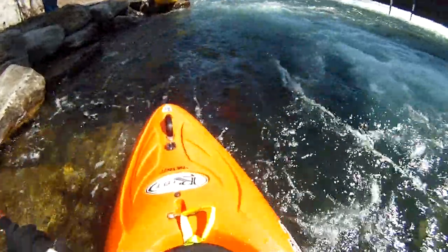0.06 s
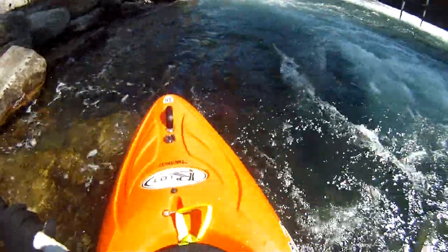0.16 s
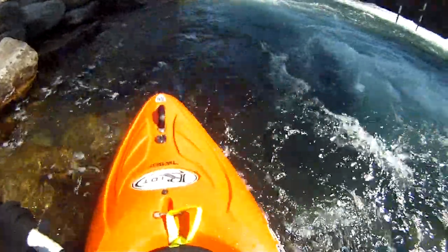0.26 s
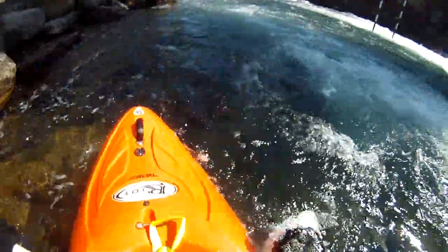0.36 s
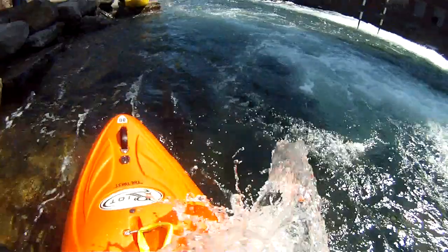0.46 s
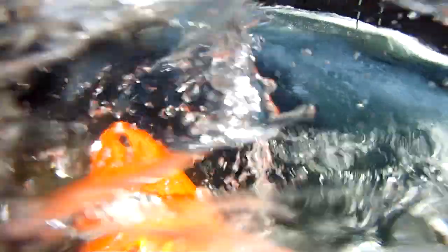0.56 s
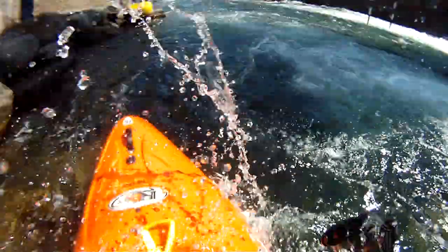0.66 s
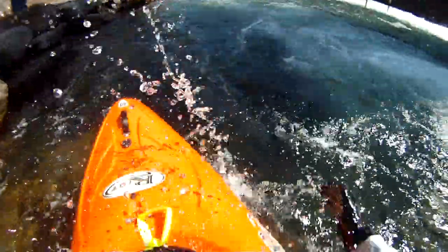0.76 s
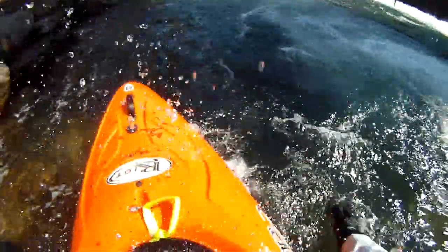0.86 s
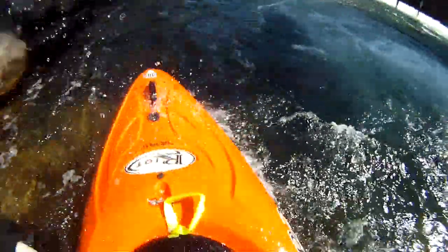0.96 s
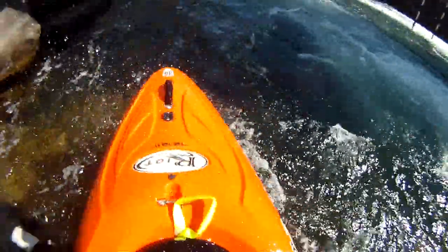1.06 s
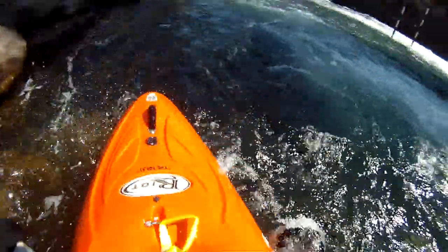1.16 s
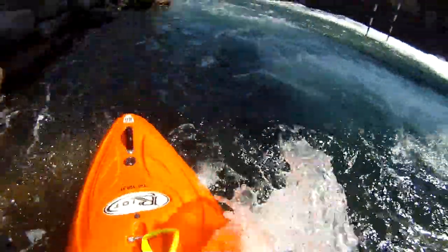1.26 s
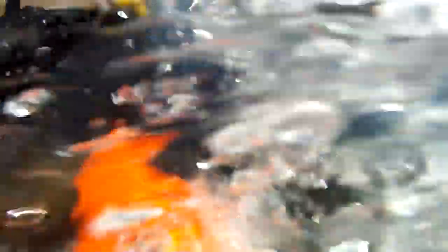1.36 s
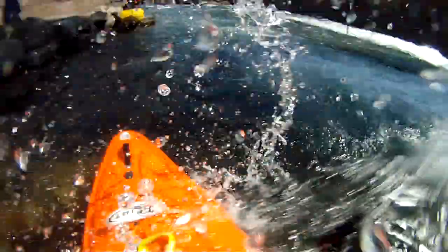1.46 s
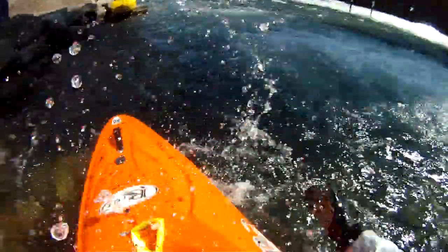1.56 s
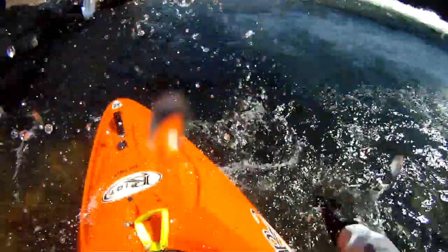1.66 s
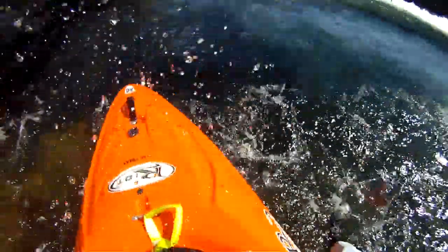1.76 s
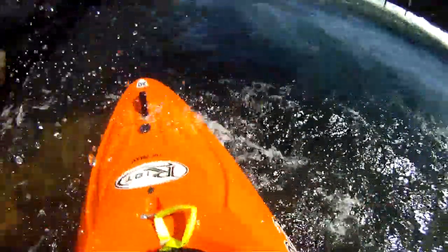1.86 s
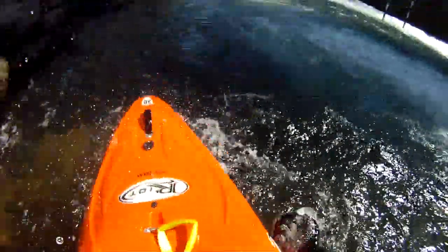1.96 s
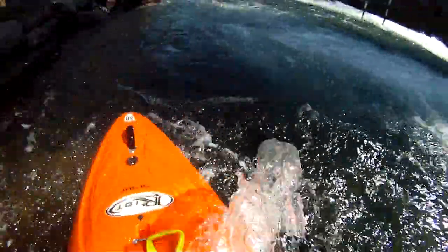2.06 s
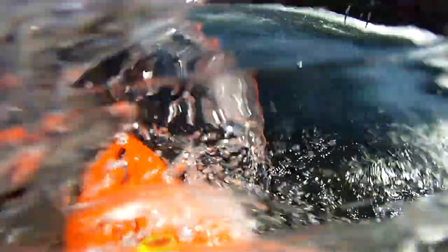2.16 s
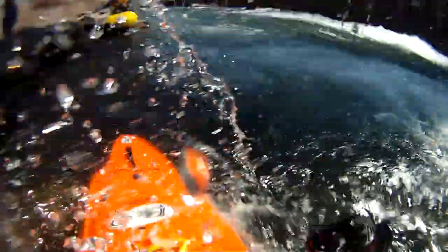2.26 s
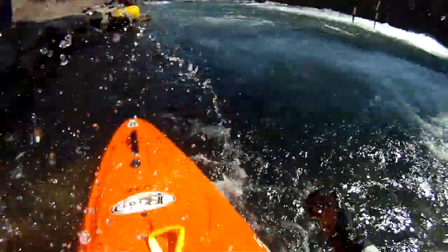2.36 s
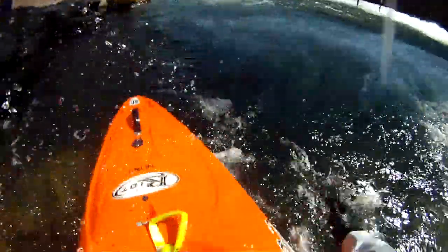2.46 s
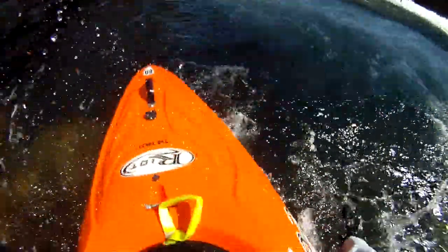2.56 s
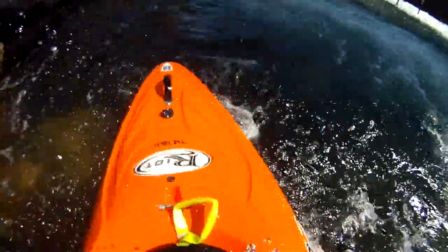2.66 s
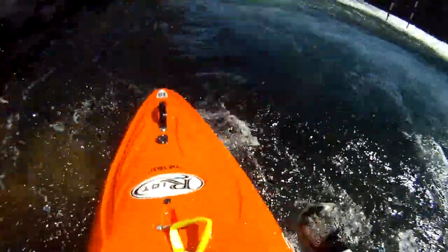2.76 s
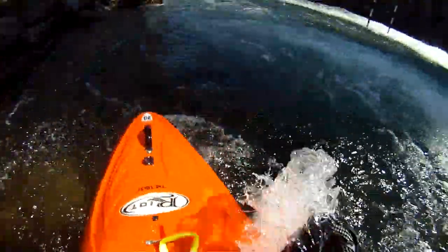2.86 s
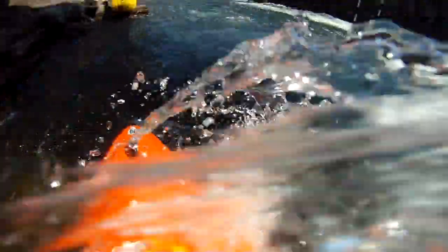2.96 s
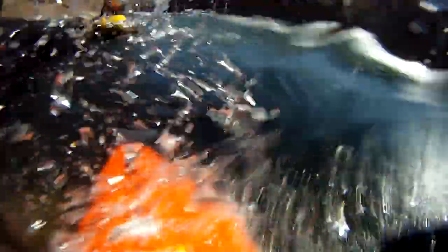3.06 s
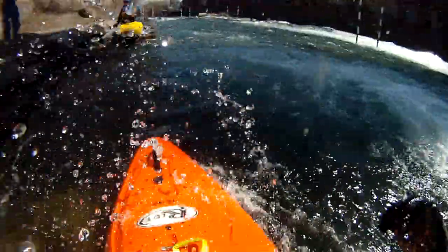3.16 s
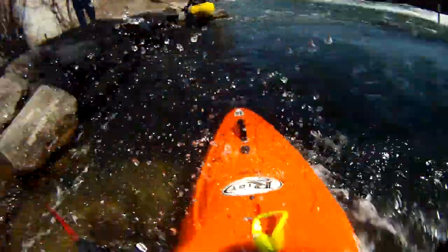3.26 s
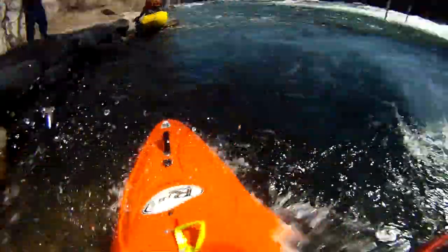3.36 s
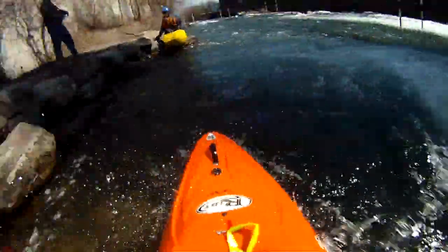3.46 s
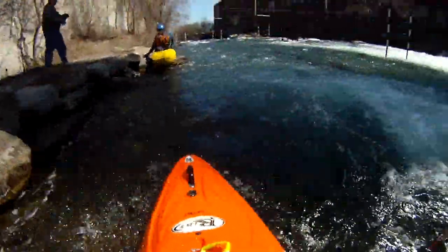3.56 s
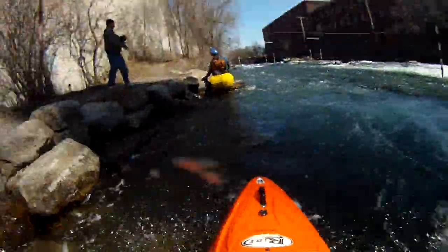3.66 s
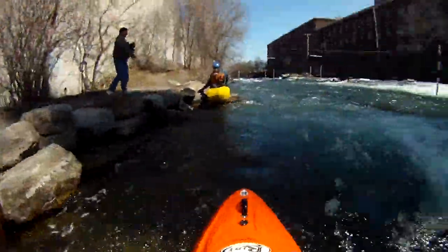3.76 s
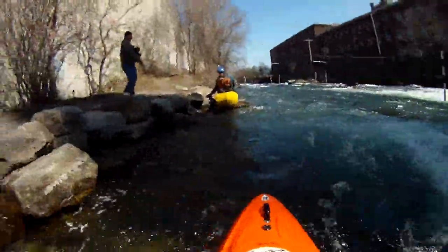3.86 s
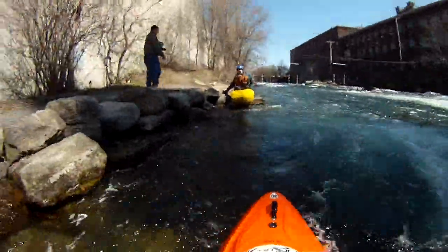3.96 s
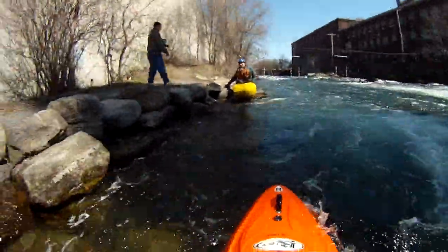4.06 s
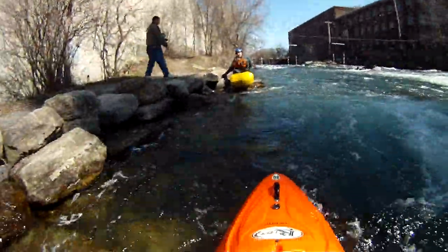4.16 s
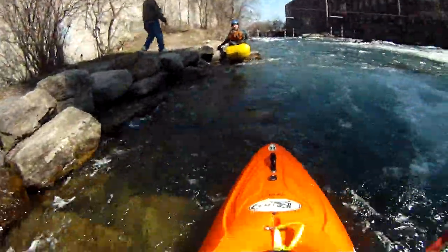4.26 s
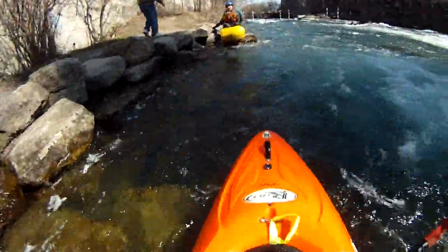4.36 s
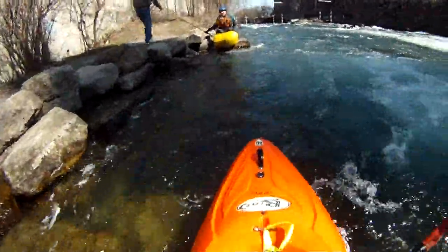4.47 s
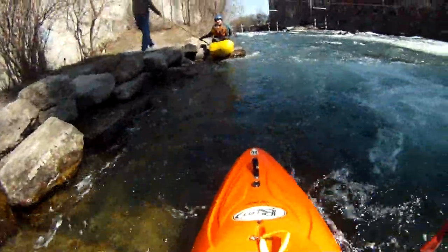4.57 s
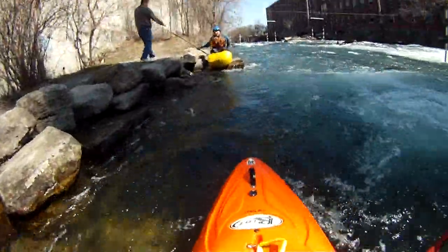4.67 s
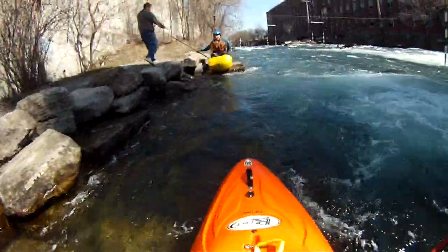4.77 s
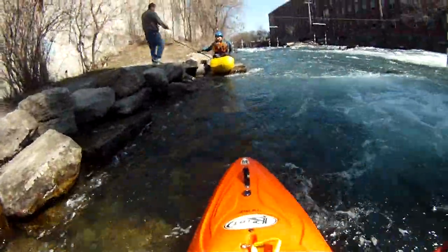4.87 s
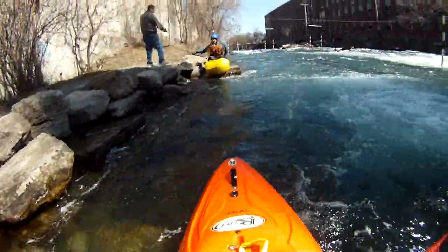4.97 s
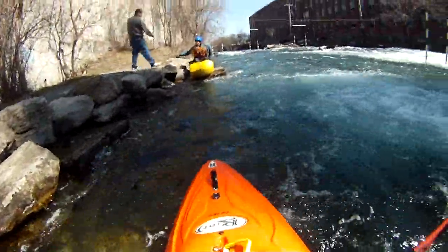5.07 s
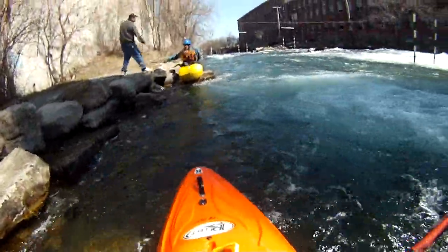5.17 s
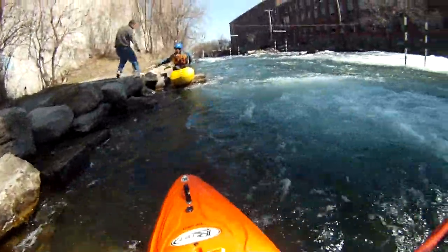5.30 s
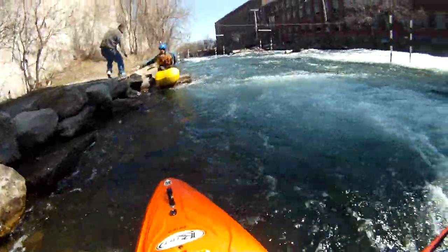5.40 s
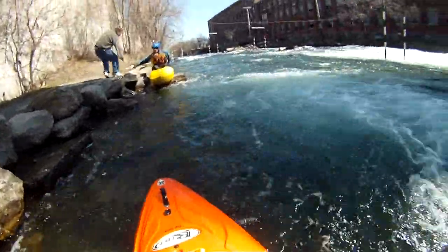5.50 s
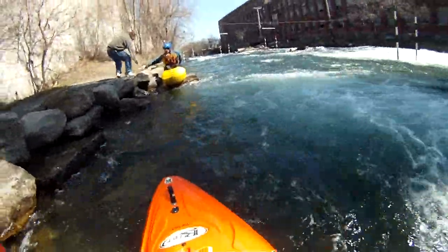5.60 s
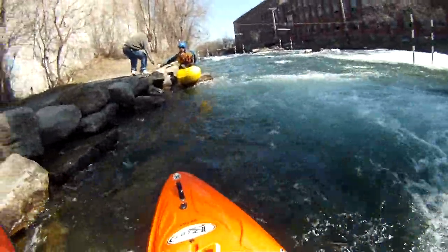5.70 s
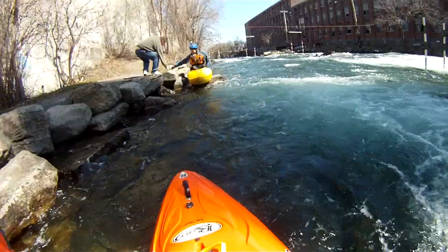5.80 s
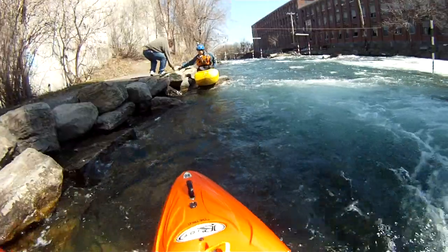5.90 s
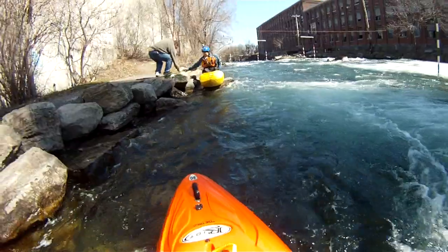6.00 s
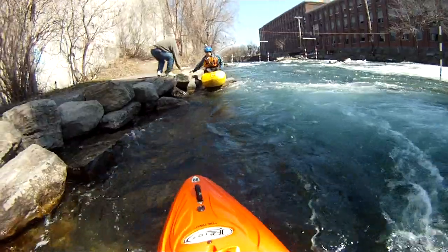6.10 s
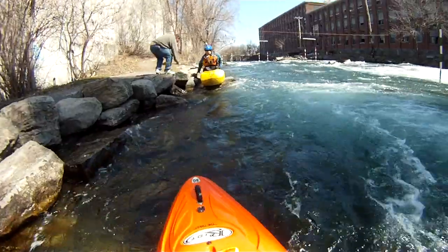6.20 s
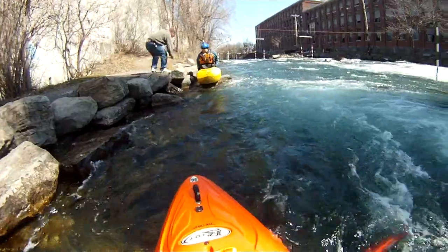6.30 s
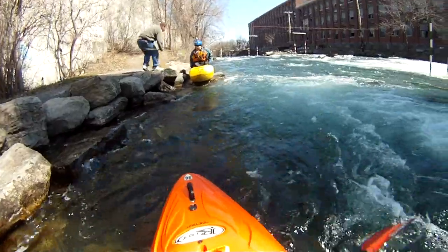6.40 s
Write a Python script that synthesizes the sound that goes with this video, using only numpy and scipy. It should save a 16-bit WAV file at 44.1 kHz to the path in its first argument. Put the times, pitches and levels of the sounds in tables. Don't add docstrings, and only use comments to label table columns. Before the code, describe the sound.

From the start a steady, muffled rush of rapids fills the background, hollow and midrange-heavy as if heard inside a plastic box, with bubbling grain and a thin gritty hiss of spray. Tiny drops tick. At about 0.65 s water slaps the housing at the microphone: a loud plasticky clatter with low thumps and spattering drops fading within a fraction of a second. A harder, overloaded smack comes at 1.45 s, with two crisp drip knocks near 1.83 and 1.88 s. More distorted slaps hit at 2.26 and 3.08 s, the last with a sharp shell knock and brief high watery chirps. Low swaying rumble and soft bumps continue around 3.4 to 4 s, with little plinks until about 3.8 s. Then the river runs evenly to 6.4 s, broken only by a small bump and drip near 5.08 s and faint ticks at 5.3 and 5.7 s.

```python
import sys
import numpy as np
from scipy import signal
from scipy.fft import rfft, irfft
from scipy.io import wavfile
from scipy.ndimage import uniform_filter1d

SR = 44100
rng = np.random.default_rng(int(sys.argv[2]) if len(sys.argv) > 2 else 0)


def generate_wav(signal):
    frames = np.transpose(np.atleast_2d(signal))
    scaled = np.clip(frames, -1, 1) * 32767
    pcm = np.round(scaled).astype(np.int16)
    wavfile.write(sys.argv[1], SR, pcm)


def voltage_ratio(level):
    return 10 ** (np.asarray(level, float) / 20)


N = 284004

# (centre [Hz], width [Hz], detuning [Hz])
HOUSING = [
    (2067, 640, 327),
    (1247, 1450, 400),
    (3503, 750, 255),
    (5150, 890, 250),
]
# (crest time [s], shell knock level [dB], strap tremble level [dB])
SPLASHES = [
    (.657, -19, -42),
    (1.447, -21, -29),
    (2.261, -15.5, -46),
    (3.078, -12, -40),
]


def evened(x):
    return x / np.sqrt(np.mean(x ** 2) + 1e-20)


def track(rows):
    s, *columns = np.transpose(rows)
    return [np.interp(np.arange(N) / SR, s, c) for c in columns]


def add(mix, s, sound):
    part = mix[..., round(s * SR):][..., :sound.shape[-1]]
    part += sound[..., :part.shape[-1]]


def band(x, lo_hz, hi_hz):
    return signal.sosfilt(signal.butter(2, [lo_hz, hi_hz], "band", fs=SR, output="sos"), x)


def ring(x, hz, width_hz):
    r = np.exp(-np.pi * width_hz / SR)
    poles = [1, -2 * r * np.cos(2 * np.pi * hz / SR), r * r]
    kick = signal.lfilter([1, 0, -1], np.convolve(poles, poles), np.eye(1, 2000)[0])
    return signal.oaconvolve(x, kick / np.linalg.norm(kick))[:len(x)]


def distant_wash(patchy_db=1.0, flicker_db=0.38):
    frames = N // 128 + 5
    a, b, patches = rng.standard_normal((frames, 257, 3)).T
    patches = uniform_filter1d(uniform_filter1d(patches, size=6, axis=0), size=12, axis=1)
    flicker = evened(uniform_filter1d(rng.standard_normal(frames), size=3))
    level_db = patchy_db * np.clip(evened(patches), -3, 1.6) + flicker_db * np.clip(flicker, -2, 1.5)
    return signal.istft((a + 1j * b) * voltage_ratio(level_db), nperseg=512, noverlap=384)[1][:N]


def river_bubbles(bubbles_per_s=3500., bubble_db=4.0):
    size = voltage_ratio(bubble_db * np.minimum(rng.exponential(1, N), 2.2)) * (rng.random(N) < bubbles_per_s / SR)
    kind, out = rng.integers(0, 30, N), np.zeros(N)
    for k, hz in enumerate(np.geomspace(400, 5700, 30)):
        turns = np.arange(0, 9, hz / SR)
        pop = np.sin(2 * np.pi * turns * (1 + 0.016 * turns)) * turns * np.exp(-turns / 1.75)
        out += signal.oaconvolve(size * (kind == k), pop * hz / np.linalg.norm(pop) / np.sqrt(hz))[:N]
    return out


def river(bubble_share=0.29, gusty_db=1.9):
    # (frequency [Hz], level per Hz [dB])
    roar_curve = [(120, -8), (250, -4), (700, -11.5), (1310, -4), (1480, -8), (1950, -1.5), (2380, 0.5),
                  (2640, -11), (3750, -9), (4250, -19.5), (4900, -13.5), (5500, -15), (5900, -24),
                  (6400, -84)]
    # (time [s], level [dB])
    roar_rows = [(0.0, -45), (0.41, -46), (0.72, -44), (1.16, -46), (1.52, -43.5), (2.1, -45.5),
                 (3.19, -45), (3.55, -44.5), (4.36, -46), (5.33, -44.5), (5.74, -46), (6.44, -45.5)]
    # (time [s], level [dB])
    spray_rows = [(0.0, -60.5), (0.5, -59.5), (1.27, -56), (1.7, -56.5), (2.0, -59), (2.71, -59),
                  (3.48, -59), (4.34, -61.5), (6.44, -61)]
    white = np.sqrt(1 - bubble_share) * evened(distant_wash())
    white += np.sqrt(bubble_share) * evened(river_bubbles()) * np.sqrt(5300 / (SR / 2))
    hz = np.fft.rfftfreq(N, 1 / SR)
    curve_hz, curve_db = np.transpose(roar_curve)
    heard = rfft(white) * voltage_ratio(np.interp(np.log(hz + 1), np.log(curve_hz), curve_db))
    top = 1 / (1 + (4100 / (hz + 1)) ** 30)
    (roar_db,), (spray_db,) = track(roar_rows), track(spray_rows)
    gusts = evened(band(rng.standard_normal(N), 6, 35))
    spray_db += gusty_db * gusts * np.clip((spray_db + 62.5) / 3, 0, 1.5)
    roar = voltage_ratio(roar_db + 1.5) * evened(irfft(heard * (1 - top), N))
    return roar + voltage_ratio(spray_db) * evened(irfft(heard * top, N))


def sway(lumpy_db=2.0, strap_db=-60, strap_follows=.4, strap_t60_s=0.43):
    # (time [s], level [dB])
    sway_rows = [(0.0, -68), (0.3, -57), (0.55, -53), (0.7, -53), (1.11, -53), (1.45, -49), (1.7, -54),
                 (2.2, -44), (2.35, -57.5), (2.94, -50), (3.1, -48), (3.35, -50.5), (3.52, -44),
                 (3.7, -46.5), (4.05, -50), (4.23, -65), (4.5, -59), (5.0, -62), (6.44, -63)]
    (deep_db,), t = track(sway_rows), np.arange(N) / SR
    deep, shake, lumps = rng.standard_normal((N, 3)).T
    lumps = voltage_ratio(lumpy_db * evened(band(lumps, 5.26, 9.7)))
    strap = voltage_ratio(strap_db + strap_follows * (deep_db - deep_db.mean()))
    for s, _, db in SPLASHES:
        strap = strap + voltage_ratio(db - 60 * abs(t - s) / strap_t60_s) * (t > s)
    return lumps * (voltage_ratio(deep_db + 1.0) * evened(band(deep, 5.3, 46)) + strap * evened(band(shake, 70.5, 127)))


def bubbles():
    # (time [s], level [dB], first pitch [Hz], last pitch [Hz], t60 [s])
    bubble_rows = [(.811, -35, 1120, 1200, .06), (1.846, -44, 5000, 5300, .09),
                   (1.8835, -33, 4400, 5800, .03), (2.373, -30, 1100, 1300, .022),
                   (2.881, -41, 4800, 4900, .05), (3.0625, -10, 3350, 3700, .028),
                   (3.1005, -15, 3400, 3500, .022), (3.291, -34, 1880, 1900, .06),
                   (3.474, -33, 2050, 2100, .07), (3.553, -30, 2000, 2100, .1), (3.737, -33, 860, 900, .06),
                   (3.752, -23, 1400, 1520, .028)]
    out = np.zeros(N)
    for s, db, first_hz, last_hz, t60 in bubble_rows:
        t = np.arange(0, t60, 1 / SR)
        turns = np.cumsum(np.linspace(first_hz, last_hz, len(t))) / SR
        add(out, s, voltage_ratio(db - 60 * t / t60) * (1 - np.exp(-t / 0.00072)) * np.sin(2 * np.pi * turns))
    return out


def jolts(shove_turns=0.37, bump_growth_s=0.0056, bump_t60_s=0.052, knock_growth_s=0.0031):
    # (crest time [s], level [dB], swing [Hz], t60 [s], direction [+-1])
    shoves = [(.6266, -19, 104, .04, 1), (.6362, -13, 104, .04, 1), (.6458, -12, 104, .075, 1),
              (.6595, -11, 95, .045, 1), (1.4242, -16.5, 118, .09, 1), (1.44, -10, 100, .02, 1),
              (1.4452, -4.5, 105, .065, -1), (2.2438, -8.5, 125, .075, -1), (2.2558, -7.5, 100, .02, 1),
              (2.2615, -5.5, 112, .03, -1), (3.0782, -3.5, 150, .012, -1), (3.0815, -2.5, 135, .024, 1)]
    # (crest time [s], level [dB], swing [Hz])
    bumps = [(.655, -16, 40), (.69, -25, 90), (.8, -35, 89.5), (1.447, -17, 200), (1.48, -16, 105),
             (1.51, -29, 105), (1.628, -32, 154), (1.841, -31.5, 115), (1.893, -36, 117), (3.375, -31, 45),
             (3.408, -23, 38), (3.423, -23, 42), (3.445, -36.5, 197), (3.487, -32.5, 96),
             (3.518, -26.5, 34.8), (3.567, -36, 60), (3.826, -34, 50), (3.987, -33, 73.5), (4.68, -42, 96),
             (4.96, -39, 106), (5.078, -30.5, 103), (5.085, -41.5, 332)]
    # (frequency [Hz], level [dB], t60 [s])
    shell = [(200, -0.5, .04), (305, -2, 0.029), (383, -10, 0.045), (706, 2, 0.017), (1040, 3.5, 0.029)]
    rows = [(s, db, hz, shove_turns / hz, t60, way) for s, db, hz, t60, way in shoves]
    for k, (s, db, hz) in enumerate(bumps):
        rows.append((s, db, hz, bump_growth_s, bump_t60_s, (-1) ** (k + 1)))
    for s, db, _ in SPLASHES:
        rows += [(s, db + mode_db, hz, knock_growth_s, t60, 1) for hz, mode_db, t60 in shell]
    out = np.zeros(N)
    for s, db, hz, growth, t60, way in rows:
        t = np.arange(-3 * growth, t60, 1 / SR)
        swell = np.where(t < 0, np.exp(-(t / growth) ** 2), voltage_ratio(-60 * t / t60))
        add(out, s + t[0], way * voltage_ratio(db) * swell * np.cos(2 * np.pi * hz * t))
    return out


def sheets(spatter_db=1.0, thud_db=-10.5):
    # (start [s], end [s], first level [dB], last level [dB])
    sheet_rows = [(0.619, 0.655, -24.5, -21.5), (0.645, .712, -26, -27), (0.717, 0.89, -37.5, -56),
                  (1.421, 1.44, -24, -19.5), (1.445, 1.464, 2, -33), (1.469, 1.489, -13, -30),
                  (1.492, 1.626, -24, -63), (2.23, 2.254, -31.5, -16), (2.257, 2.266, -12, -9),
                  (2.274, 2.306, -29, -31), (3.058, 3.07, -29, -23), (3.069, 3.11, -19.5, -33),
                  (1.826, 1.887, -42.5, -46), (3.44, 3.49, -57, -39), (5.066, 5.115, -44, -52)]
    wall_db = [-4.5, -7, -12.5, -16.5]
    flow = np.zeros(N)
    for start, end, first_db, last_db in sheet_rows:
        add(flow, start, voltage_ratio(np.linspace(first_db, last_db, round((end - start) * SR))))
    spatter = voltage_ratio(spatter_db * evened(band(rng.standard_normal(N), 46, 400)))
    *noise, low = rng.standard_normal((N, len(HOUSING) + 1)).T
    out = voltage_ratio(thud_db) * flow * evened(band(low, 101, 395))
    for db, n, (hz, width_hz, _) in zip(wall_db, noise, HOUSING):
        out += voltage_ratio(db) * ring(flow * spatter * n, hz, width_hz)
    return out


def drops(lag_s=.0006, rise_s=0.00036, ragged_db=1.5, tick_db=-11.5, drop_t60_s=0.015, longer_per_db=0.0046,
          away_db=-11, scatter_db=2.5):
    # (time [s], level [dB], landing place [0 wide wall .. 3 small wall])
    slaps = [(.614, -16.5, -0.5), (.619, -13.5, 0.46), (.6414, -21, 2.5), (.6524, -11, 1.5),
             (.6568, -2, 1.13), (.6589, -11, -0.1), (.6664, -5.5, 1), (.672, -14, 1.6), (.6753, -1, 1.7),
             (.6897, -10, 0.8), (.6952, -9.5, 3.5), (.6956, -14, 0.5), (1.416, -14.5, 0.4), (1.443, -2, 2),
             (1.4457, -2, 1.7), (1.4544, -19, 1), (1.4604, -15, 0), (1.4708, -11.5, 1.5), (1.478, -8, 0.94),
             (2.2415, -11.5, 0.4), (2.2489, -9.5, 0.2), (2.2628, 8.5, -0.05), (2.2844, -18, 1.5),
             (2.2981, -13, 0.5), (3.0604, -8.5, 1), (3.0743, -11.5, 1), (3.0781, 0, .5), (3.0819, -4, 1.5),
             (3.0909, -7, 1.45), (3.1009, -22, 1.3)]
    # (time [s], level [dB], landing place [0 wide
    small_drops = [(0.7036, -18, 5), (.718, -24, 1.6), (.7253, -27.5, 1.8), (0.7333, -29, 2.2), (.7436, -29, 0.4),
                   (1.4976, -22, 0.6), (1.511, -16.5, 1.3), (1.52, -25, -1.5), (1.5754, -32, 0.5),
                   (1.582, -36, 0.5), (2.2764, -23, -2), (1.4745, -14.5, 3), (.6545, -12.5, 5.5),
                   (1.5328, -26, 1.1), (1.5397, -25.5, 2), (1.548, -29, 2.2), (1.568, -29.5, 1.5),
                   (1.617, -28, 0.9), (1.6274, -33.5, 1), (2.324, -27, 1.2), (2.374, -24, 0.26),
                   (3.05, -20.5, 0.5), (3.1542, -37, 1.8), (3.2148, -35, 2.5), (2.549, -40, 0), (2.8554, -42, 0),
                   (2.9398, -41, 3), (3.03, -42, 3),
                   (.1604, -34, 1.7), (.3217, -33, 2.26), (.4944, -34, 0.56), (.9675, -36, 1.5),
              (1.0536, -36, 2.6), (1.1424, -35, 2.3), (1.1865, -28, 1.2), (1.2518, -39, 2.6),
              (1.2712, -31.5, 1.7), (1.8281, -16.5, 0.95), (1.8815, -14.5, 1.07), (1.9225, -31, 0.82),
              (2.1162, -32, 1.4), (2.5726, -39, 1), (2.6873, -34, 2.7), (2.7501, -30.5, 0.63),
              (2.9088, -35, 0.91), (2.9238, -32, 0.45), (3.2944, -28.5, 0.17), (3.4404, -30.5, .4),
              (3.4813, -30, .3), (3.5546, -33, 1.2), (3.7287, -30, 0.83), (3.753, -26.5, 1.35),
              (3.782, -29, 0.7), (5.09, -36, .3), (5.3307, -37, 2.25), (1.8337, -33, 1.4),
              (5.6858, -34, 0.83)]
    rows = slaps + small_drops
    out, chance = np.zeros(N), rng.uniform(-1, 1, (len(rows), 4, len(HOUSING)))
    ragged = voltage_ratio(ragged_db * evened(band(band(rng.standard_normal(N), 124, 510), 124, 510)))
    grit = evened(band(band(rng.standard_normal(N), 800, 3800), 800, 3800))
    hz, _, spread_hz = np.transpose(HOUSING)
    walls = np.argsort(np.argsort(hz))
    for (s, db, place), (scatter, *luck) in zip(rows, chance):
        t60 = drop_t60_s * max(1 + longer_per_db * (db + 18.5), .2)
        t = np.arange(0, t60, 1 / SR)
        shape = voltage_ratio(db - 3.5 - 60 * t / t60) * (1 - np.exp(-(t / rise_s) ** 2))
        trio_hz = hz + spread_hz * np.array(luck)
        trios = np.sin(2 * np.pi * trio_hz[..., None] * t).sum(0)
        away = abs(walls - place)
        modes = voltage_ratio(away_db * (away - away.min()) + scatter_db * scatter) @ trios
        here = slice(round(s * SR), round(s * SR) + len(t))
        add(out, s + lag_s, shape * (modes * ragged[here] + 2 * voltage_ratio(tick_db) * grit[here]))
    return out


def scene():
    return np.tile(river() + sway() + bubbles() + jolts() + sheets() + drops(), (2, 1))


def band_limit(x):
    return signal.sosfilt(signal.butter(12, 15750, fs=SR, output="sos"), x)


def record(dry, knee_db=-14.0, squeeze=0.61, recover_db_per_s=96.0, edge_hz=15300, headroom=3.1,
           unlike_db=-28.5):
    power_db = 10 * np.log10(abs(uniform_filter1d(dry[0] ** 2, size=500, origin=249)) + 1e-12)
    fall_db = np.arange(N) * recover_db_per_s / SR
    over_db = np.maximum(np.maximum.accumulate(power_db + fall_db) - fall_db - knee_db, 0)
    ducked = dry / voltage_ratio(squeeze * uniform_filter1d(over_db, size=900, origin=449))
    slow = signal.resample_poly(ducked, 40, 147, axis=1)
    steps = np.repeat(headroom * np.tanh(slow / headroom), 4, axis=1)
    held = signal.resample_poly(steps, 147, 160, axis=1)[:, :N]
    unlike = evened(band(rng.standard_normal(N), 7.6, 400))
    held[1] *= 1 + voltage_ratio(unlike_db) * unlike * np.clip(over_db / 10, 0, 1)
    edge = signal.firwin(401, edge_hz, window=("kaiser", 9), fs=SR)
    return band_limit(signal.oaconvolve(np.clip(held, -1, 1), edge[None], "same"))


dry = scene()
out = record(dry)
generate_wav(out)
```